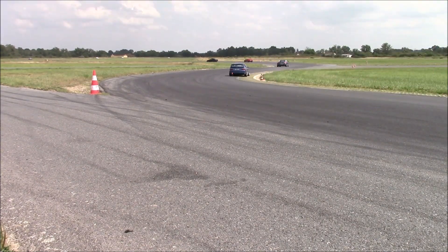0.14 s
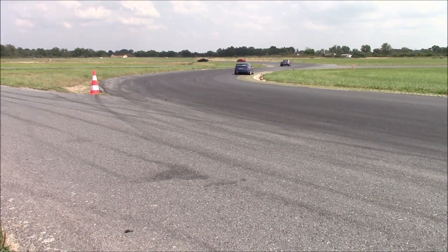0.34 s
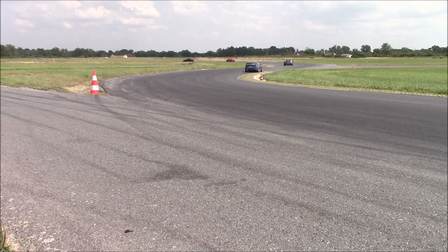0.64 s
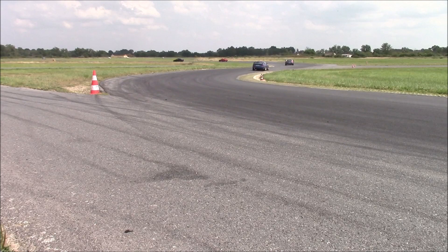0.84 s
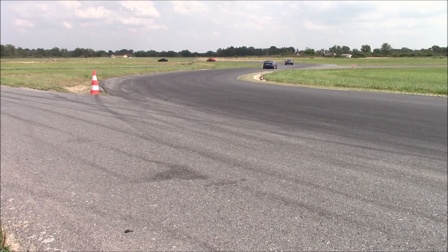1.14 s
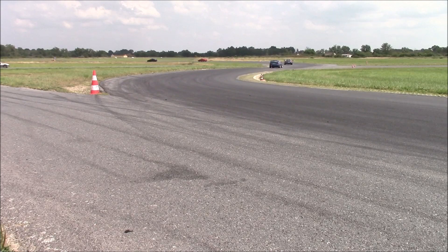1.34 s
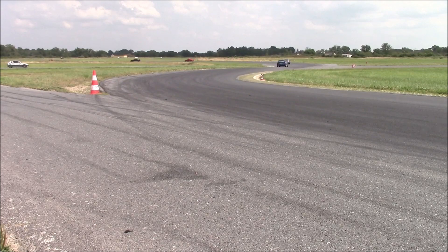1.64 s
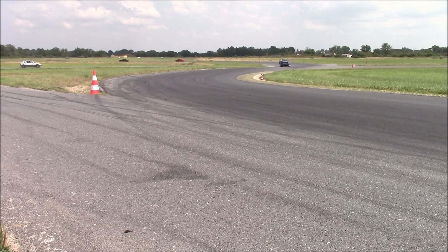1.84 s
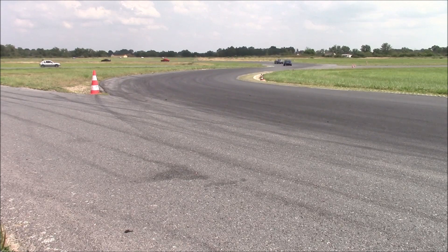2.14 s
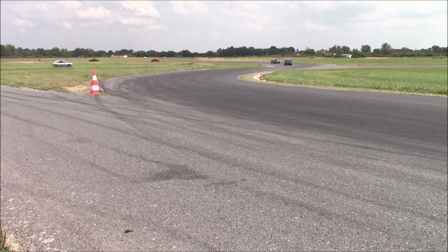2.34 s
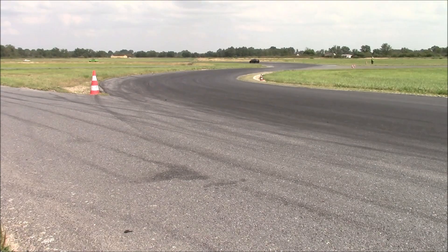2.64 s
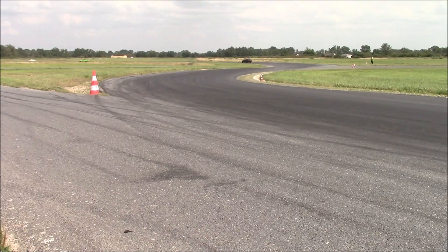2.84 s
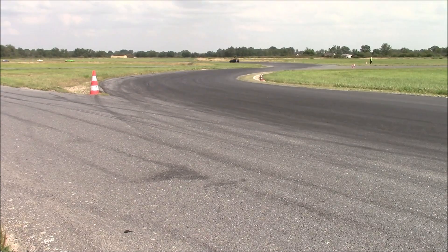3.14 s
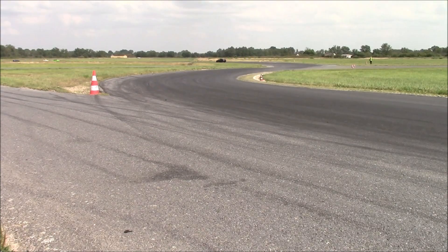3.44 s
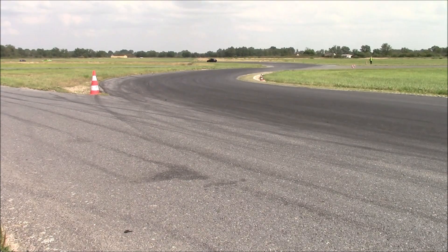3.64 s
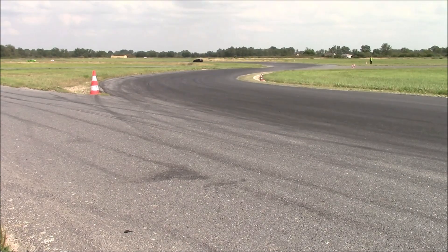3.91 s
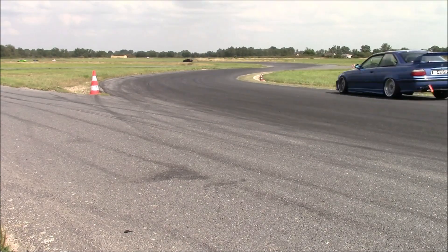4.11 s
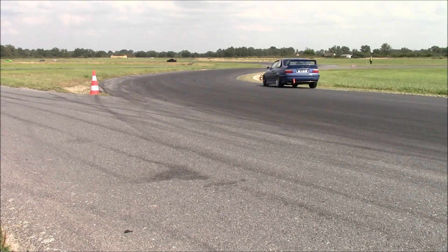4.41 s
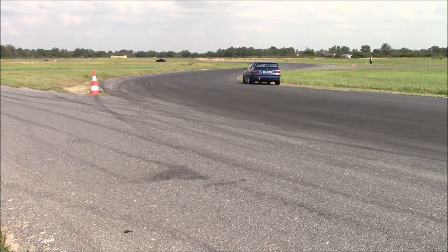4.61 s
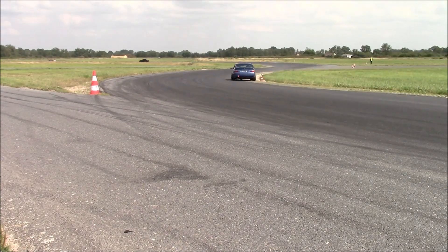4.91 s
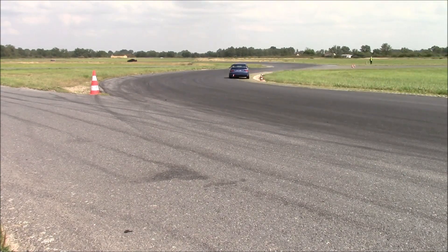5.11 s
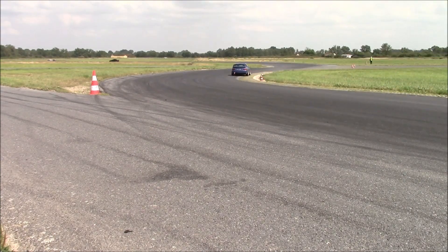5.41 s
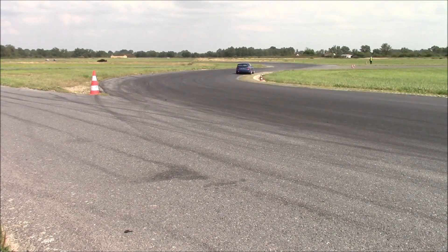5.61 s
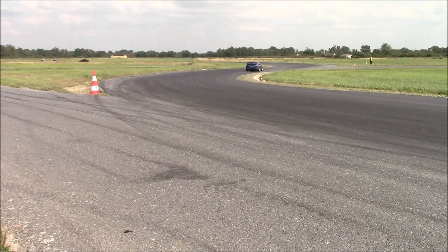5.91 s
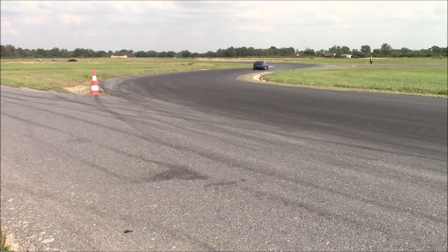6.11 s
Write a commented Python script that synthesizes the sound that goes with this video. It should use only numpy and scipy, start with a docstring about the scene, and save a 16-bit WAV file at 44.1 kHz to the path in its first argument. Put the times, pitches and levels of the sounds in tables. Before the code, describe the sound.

On an open race circuit, a raspy six-cylinder car pulls away at high revs, its tyres squealing briefly. A distant engine drones as it fades, lifts for a gear change and pops softly. After an abrupt cut, another pass swells up wide in stereo, rushes by with tyre hiss, dips, then drives off with higher, thinner squeals. Low rumble comes and goes at the fixed trackside microphone.

```python
"""A straight-six car drives away with a squeal of tyres while a low rumble comes and goes in stretches; a far
engine drones, the car lifts for a gear change and its exhaust pops. After a jump in time a second pass opens
wide in stereo, slides past, pulls away and squeals again. The exhaust is a sum of harmonics of two branches
firing in turn, with a click at each firing; roar, rasp, tyre scrub, hiss and rumble are filtered noise; squeals
and the far engine are frequency-modulated tones; the pops are pulses that ring a resonant pipe."""
import sys
import numpy as np
from scipy import signal
from scipy.fft import rfft, irfft, next_fast_len
from scipy.io import wavfile
from scipy.ndimage import uniform_filter1d

SR = 44100
rng = np.random.default_rng(int(sys.argv[2]) if len(sys.argv) > 2 else 0)


def gain_from_db(level_db):
    """Convert decibel levels to linear amplitude factors (20 dB per decade)."""
    decades = np.asarray(level_db, float) / 20
    return 10 ** decades


def transcribe(signal):
    """Save signal, clipped to [-1, 1], as a 16-bit WAV file at the path in sys.argv[1]."""
    frames = np.atleast_2d(signal).T
    limited = np.clip(frames, -1, 1)
    pcm = np.round(limited * 32767).astype(np.int16)
    wavfile.write(sys.argv[1], SR, pcm)


N = 276066
STEP = 40   # samples between the values of slow controls


def rms_one(x):
    """Normalization by the root mean square: the result has rms 1."""
    return x / np.sqrt(np.mean(x ** 2) + 1e-20)


def in_time(rows):
    """Linear interpolation of a table's columns over its times, one value a sample."""
    s, *columns = np.transpose(rows)
    return [np.interp(np.arange(N) / SR, s, column) for column in columns]


def sounding(rows, fade=.07):
    """Linear envelope: 1 inside a table's time span, with fades [s] at both ends."""
    t = np.arange(N) / SR
    fade_in = np.clip((t - rows[0][0]) / fade, 0, 1)
    fade_out = np.clip((rows[-1][0] - t) / fade, 0, 1)
    return fade_in * fade_out


def slow(rate):
    """Random fluctuation of rms 1: white noise through a double pole at rate [Hz], one value a step."""
    r = np.exp(-2 * np.pi * STEP * rate / SR)
    white = rng.standard_normal(N // STEP + 2002)
    run = signal.lfilter([1], [1, -2 * r, r * r], white)[2000:]   # the filter has settled by then
    return rms_one(run - run.mean())[:len(range(0, N, STEP))]


def spread(steps):
    """Linear interpolation from one value a step to one a sample."""
    return np.interp(np.arange(N) / STEP, np.arange(len(steps)), steps)


def drift(rate):
    """Random fluctuation as in slow(), one value a sample."""
    return spread(slow(rate))


def noise(spectrum, patchy_db, count=3):
    """Spectral shaping of white noise in overlapping bands, each flickering by itself; rms 1."""
    size = next_fast_len(N)
    log_hz = np.log(np.fft.rfftfreq(size, 1 / SR) + 1)
    hz, db = np.transpose(spectrum)
    gain = gain_from_db(np.interp(log_hz, np.log(hz), db, left=-90, right=-90))
    shaped = rfft(rng.standard_normal(size)) * gain
    centres = np.linspace(np.log(hz[0]), np.log(hz[-1]), count)
    total = 0
    for row in np.eye(count):
        share = np.interp(log_hz, centres, row)
        flicker = spread(gain_from_db(patchy_db * slow(19.0)))
        total = total + flicker * irfft(shaped * share, size)[:N]
    return rms_one(total)


def rumble(patchy_db):
    """Gated low-frequency noise: a faint floor, and stretches in which the rumble opens, holds and shuts."""
    # rumble spectrum: (frequency [Hz], density [dB per Hz])
    rumble_spectrum = [(12, -27), (20, 13), (38, 10.5), (70, 6), (102, 0.5), (130, -4.5), (170, -16),
                       (290, -120)]
    # stretches: (start of the hold [s], length of the hold [s], level [dB], extra level of the deepest part [dB])
    rumble_rows = [(0, 0.93, -38, 3), (.95, 0.48, -50, 3), (2.27, .05, -61, -8), (3.23, 0.94, -37, -0.5),
                   (4.198, .15, -49, 0.5), (4.628, 0.752, -39, -4.0), (5.8, .2, -50, 7),
                   (5.958, .35, -39, 8.5)]
    floor_db, deep_hz = -74, 45
    rise_s, fall_s = .03, 0.045
    t = np.arange(N) / SR
    bass = noise(rumble_spectrum, patchy_db, count=2)
    deep = signal.sosfilt(signal.butter(1, deep_hz, fs=SR, output="sos"), bass)
    out = gain_from_db(floor_db) * bass
    for s, length, db, deep_db in rumble_rows:
        shape = np.interp(t, [s - rise_s, s, s + length, s + length + fall_s], [0, 1, 1, 0]) ** 2
        out = out + gain_from_db(db) * shape * (bass + (gain_from_db(deep_db) - 1) * deep)
    return out


def far_engine():
    """Harmonic tone with frequency drift: a firing tone, its octave and a weak lope by amplitude modulation."""
    # far engine: (time [s], firing rate [Hz], level [dB])
    far_rows = [(1.2, 171, -35), (1.45, 168, -40), (1.57, 170.7, -33), (2.26, 169.9, -33),
                (2.645, 172.3, -31.5)]
    hz, db = in_time(far_rows)
    turn = 2 * np.pi * np.cumsum(hz + 1.5 * drift(13.9)) / SR
    firing = np.sin(turn) * (1 + 0.34 * np.sin(turn / 6))
    octave = gain_from_db(-5.0 + 3.5 * drift(2.6)) * np.sin(2 * turn)
    level = sounding(far_rows, fade=0.0058) * gain_from_db(db + 2.5 * drift(32.8))
    return level * np.sqrt(2) * (firing + octave)


def squeals():
    """Stick-slip oscillation: rubber slips and grips, so pitch and strength of each tone shake at random."""
    # one track a squeal: (time [s], centre frequency [Hz], level [dB])
    squeal_tracks = [
        [(0.6, 819, -29), (1.056, 782, -24), (1.5, 798, -31)],
        [(5.4, 1606, -53), (5.61, 1708, -33), (5.9, 1681, -39.5), (6.26, 1612, -44)],
        [(5.3, 2420, -49), (5.83, 2347, -44), (5.928, 2465, -47), (6.2, 2389, -44)],
        [(1.65, 1550, -46), (1.962, 1484, -44), (2.05, 1483, -51)],
    ]
    # rms shake of the frequency of each squeal: [Hz]
    squeal_shakes = [29.35, 87.6, 110, 93]
    out = 0
    for rows, shake_hz in zip(squeal_tracks, squeal_shakes):
        hz, db = in_time(rows)
        turn = 2 * np.pi * np.cumsum(hz + shake_hz * drift(63.4)) / SR
        out = out + sounding(rows) * gain_from_db(db + 1.1 * drift(25)) * np.sqrt(2) * np.sin(turn)
    return out


def firing_puffs(turn):
    """Periodic modulation: each firing lets out a puff; one branch is stronger, one cylinder leads the cycle."""
    return np.exp(0.45 * np.cos(2 * turn - .5) + 0.061 * np.cos(turn) + 0.23 * np.cos(turn / 3))


def treble(rasp_db, scrub_db, hiss_db, width, puffs):
    """Amplitude-modulated noise: rasp and tyre scrub pulse with the firings, hiss and air less so."""
    # spectra of the four noises: (frequency [Hz], density [dB per Hz])
    rasp_spectrum = [(530, -9), (900, 3), (1090, -2), (1370, -3.5), (2000, -12), (2600, -55), (4400, -120)]
    scrub_spectrum = [(1180, -30), (2000, -3.5), (2820, -2), (4500, -18), (5850, -52), (9900, -120)]
    hiss_spectrum = [(2650, -2), (4500, -1.5), (6630, 0), (8000, -8.5), (10400, -34), (17600, -120)]
    air_spectrum = [(4710, -7), (8000, -2.5), (10700, 0), (13700, -11), (14500, -19)]
    air_db = hiss_db + 2.5 - 14.5 * width   # the top is duller while the stereo image is wide
    rough = gain_from_db(rasp_db) * noise(rasp_spectrum, 0.21) + gain_from_db(scrub_db) * noise(scrub_spectrum, 0.86)
    smooth = gain_from_db(hiss_db) * noise(hiss_spectrum, 1.0) + gain_from_db(air_db) * noise(air_spectrum, 1.0)
    pulsed = rough * rms_one(puffs ** 0.47) + smooth * rms_one(puffs ** 0.25)
    return gain_from_db(1.06 * drift(6.2)) * pulsed


def pops(pipe=((330, .05), (430, .04))):
    """Resonance: with the throttle shut, each pop is a soft push that rings the pipe (frequency [Hz], t60 [s])."""
    # exhaust pops: (time [s], relative strength [dB])
    pop_rows = [(2.276, -6.5), (2.304, -11), (2.34, -17), (2.445, -15), (2.502, -16), (2.539, -18)]
    clicks, out = np.full(N, 1e-18), 0
    clicks[[round(s * SR) for s, db in pop_rows]] = gain_from_db(np.array(pop_rows)[:, 1] - 9.5)
    push = signal.sosfilt(signal.butter(4, [220, 700], "band", fs=SR, output="sos"), clicks)
    for hz, t60 in pipe:
        r, w = gain_from_db(-60 / (t60 * SR)), 2 * np.pi * hz / SR
        out = out + signal.lfilter([0, np.sin(w)], [1, -2 * r * np.cos(w), r * r], push)
    return out


def roar(lope_db):
    """Broadband noise of the tyres, shaped in spectrum, at the level of the exhaust's lope."""
    # roar spectrum: (frequency [Hz], density [dB per Hz])
    roar_spectrum = [(120, -37), (180, -15), (230, -10), (330, -5), (550, 4), (800, -1.5), (1000, -33),
                     (1200, -40)]
    return gain_from_db(lope_db) * noise(roar_spectrum, 1.0)


def cracks(turn, upper_db, uneven=.3, early=.75, jitter=.03, scatter_db=2.5):
    """Pulse train: a sharp click leads every firing; the two branches are unevenly spaced (phases in radians)."""
    # relative strength of the six clicks of a cycle: [dB]
    cylinder_strengths = [9, 14, -8.5, 4.5, 3, 10.5]
    firing = np.arange(1, int(turn[-1] / np.pi))
    late, strength = rng.standard_normal((len(firing), 2)).T
    at = np.searchsorted(turn, np.pi * firing + uneven * (firing % 2) - early + jitter * late)
    clicks = np.full(N, 1e-18)
    clicks[at] = gain_from_db(np.array(cylinder_strengths)[firing % 6] + scatter_db * strength)
    rise = signal.butter(2, 1300, "high", fs=SR, output="sos")
    fall = signal.butter(4, 2100, fs=SR, output="sos")
    train = rms_one(signal.sosfilt(np.vstack([rise, fall]), clicks))
    # -33 dB where the upper tones stand at -35 dB; the clicks swing 1.24 times as far
    return gain_from_db(-33 + 1.24 * (upper_db + 35)) * train


def swell(multiple):
    """Gaussian envelopes in dB by which one exhaust tone swells or fades, one value a step."""
    # swells: (centre [s], width between 1/e points [s], multiple of the branch rate, change [dB])
    swell_rows = [(.08, 0.71, 5, -4), (.12, 0.65, 6, -11), (0.206, 0.62, 4.67, 15),
                  (0.278, 0.47, 6.33, -10.5), (0.372, 0.52, 14, 7.5), (0.327, 0.59, 16, 6),
                  (.4, 0.68, 3.33, -10), (0.673, 0.27, 7, -6), (0.71, 0.35, 9, 8.5), (0.762, 0.42, 4, 3.5),
                  (0.877, 0.16, 6, -16), (0.942, 0.36, 5, -8.5), (1.0, 0.13, 9, -16), (1.05, 0.38, 6, 7),
                  (1.051, .2, 6.33, 7), (1.12, 1.0, 11, 14.5), (1.12, 0.94, 4.33, -14.5), (1.21, .2, 9, 14),
                  (1.3, 0.2, 13, 17.5), (1.298, 1, 1, -11), (1.117, 0.23, 4, -4.5), (1.15, 0.18, 5, 2),
                  (1.37, 0.82, 3, -7), (1.52, 0.28, 5, -7.5), (1.593, 0.17, 7, 3.5), (1.62, 0.25, 6.33, 7),
                  (1.802, 1, 4, 4.5), (2.045, 0.72, 3.67, 11), (2.0, 0.91, 11, 9), (2.2, 0.88, 7, -14),
                  (2.36, 0.92, 6.33, -18), (2.403, 0.29, 3, 9.5), (2.48, 0.089, 3, 3), (2.55, 0.12, 4, 9),
                  (2.578, 0.38, 3.67, 19), (2.715, 0.13, 3, -6), (2.812, 0.089, 5, 12),
                  (2.95, 0.69, 1, -16), (3.0, 0.69, 5, -8.5), (3.069, 0.37, 6, -36),
                  (3.16, 0.74, 4.33, -18), (3.303, 0.15, 7, 2.5), (3.406, 0.11, 5, -4), (3.4, .5, 14, 5),
                  (3.419, 0.14, 4, 4), (3.5, 0.41, 13, 11), (3.614, .15, 6, 0), (3.85, .7, 11, 4.5),
                  (3.848, 0.22, 7, -4), (3.917, .35, 4.33, 4.5), (3.926, 0.23, 6, -9),
                  (3.92, 0.27, 6.33, -10), (3.996, 0.093, 5, 7), (4.025, 0.16, 7, 5),
                  (4.101, 0.14, 3.67, 13), (4.1, .12, 4.33, 9.5), (4.047, 0.27, 4, -4),
                  (4.12, 0.11, 3, 2.5), (4.2, 0.13, 6, -10), (4.201, .15, 5.33, 12), (4.2, 0.59, 6.33, 6.5),
                  (4.3, .3, 7, 3), (4.33, 0.063, 5, 2), (4.44, 0.19, 5, -7), (4.36, 0.697, 3.33, -9),
                  (4.363, 1, 3, 3.5), (4.5, 0.47, 4.67, 9), (4.598, 0.13, 4, -8), (4.7, .12, 6.33, 4.5),
                  (4.72, 0.098, 9, 5), (4.799, 0.96, 6.67, 24.5), (4.829, 0.13, 9, -22), (4.85, 0.54, 1, 7),
                  (5.202, 0.38, 6.33, 9.5), (5.098, 0.35, 2, -2), (5.2, 0.46, 3, -5.5),
                  (5.392, 0.22, 4, -6.5), (5.42, 0.24, 6, 5.5), (5.53, 0.11, 6, -15), (5.647, 0.12, 9, -12),
                  (5.67, 0.24, 7, -15), (5.847, 0.54, 4.33, 7.5), (5.9, 0.89, 1, -7), (6.0, .6, 12, -8),
                  (6.08, 0.33, 3.33, -4), (6.245, 0.071, 6, 5.5)]
    t = np.arange(0, N, STEP) / SR
    return sum(db * np.exp(-(2 * (t - s) / length) ** 2)
               for s, length, k, db in swell_rows if round(3 * k) == round(3 * multiple))


def exhaust(turn, level_db, tilt, upper_db, lope_db):
    """Fourier synthesis: whole multiples of the branch rate are clean tones, unequal cylinders add thirds."""
    # tones in rising thirds: (rounded multiple of the branch rate, relative level [dB])
    order_levels = [(0.333, -47), (0.667, -54), (1.0, -24), (1.33, -28), (1.67, -38.5), (2.0, -6.5),
                    (2.33, -17.5), (2.67, -26.5), (3.0, -3.5), (3.33, -16), (3.67, -19), (4.0, -3),
                    (4.33, -11.5), (4.67, -20), (5.0, 1), (5.33, -20), (5.67, -16), (6.0, -5), (6.33, -12),
                    (6.67, -35), (7.0, -2.5), (7.33, -29), (7.67, -20.5), (8.0, -41), (8.33, -28.5),
                    (8.67, -32), (9.0, -18.5), (9.33, -25), (9.67, -32.5), (10.0, -27.5), (10.3, -34),
                    (10.7, -36), (11.0, -25), (11.3, -33), (11.7, -50), (12.0, -39.5), (12.3, -25),
                    (12.7, -68), (13.0, -29), (13.3, -31.5), (13.7, -48), (14.0, -28.5), (14.3, -48),
                    (14.7, -47), (15.0, -37.5), (15.3, -29), (15.7, -64), (16.0, -30)]
    pass_s, pass_length_s, pass_slur = 4.15, .8, .3   # sliding past, the car churns the air: extra slur [rad]
    level_db, tilt, upper_db, lope_db = [c[::STEP] for c in (level_db, tilt, upper_db, lope_db)]
    bass_swing_db = level_db + 17
    t = np.arange(0, N, STEP) / SR
    slur = .07 + pass_slur * np.exp(-(2 * (t - pass_s) / pass_length_s) ** 2)
    lead, out = 1.85 + 0.43 * slow(0.47), 0
    for thirds, (_, db) in enumerate(order_levels, start=1):
        k = thirds / 3
        phase = slur * np.sqrt(k) * slow(6)   # moving air slurs the tones
        if thirds % 3:
            db = db + lope_db + 6.5 + 4.0 * slow(1.46)
            phase = phase + 2 * np.pi * rng.random()
        else:
            if k <= 7:
                octaves = np.log2(max(k, 2) / 4)
                db = db + level_db + tilt * octaves + 0.66 * slow(56.0)
            else:
                phase = phase + .35 * slow(12)   # the upper multiples are slurred more
                db = db + upper_db + 26.0 + 1.5 * slow(4.2)
            # two even pulses a turn: the odd multiples run a quarter cycle behind,
            # so the branches differ in shape only
            phase = phase + lead - np.pi / 2 * (k % 2) + 0.026 * k ** 2
        if k < 1.5:   # tones well below the firing tone (k = 2) rise and fall further with the level
            db = db + bass_swing_db
        tone = np.cos(k * turn + spread(phase))
        out = out + spread(np.sqrt(2) * gain_from_db(db + swell(k))) * tone
    return out


def port_difference(same, unrelated):
    """Stereo decorrelation: half of left minus right, by level, phase and coherence across frequency."""
    # ports: (frequency [Hz], level against the middle [dB], phase ahead [rad], share of unrelated noise [0-1])
    port_rows = [(500.3, -70, 0, 0.75), (865, -24.5, -0.17, 0.5), (1700, -13.5, 0.87, .15),
                 (3380, -12.5, -0.86, 0.6), (5500, -4, -2, .35), (10100, -2, -2, 0.8), (14000, 2, -1, .7)]
    size = next_fast_len(N)
    hz, *columns = np.transpose(port_rows)
    log_hz = np.log(np.fft.rfftfreq(size, 1 / SR) + 1)
    db, ahead, share = [np.interp(log_hz, np.log(hz), c) for c in columns]
    share = np.clip(share, 0, 1)
    coherent = np.sqrt(1 - share) * np.exp(1j * ahead) * rfft(same, size)
    incoherent = np.sqrt(share) * rfft(unrelated, size)
    return irfft(gain_from_db(db) * (coherent + incoherent), size)[:N]


def scene():
    """Superposition of all sources as a middle and a side signal, summed for the two microphone ports."""
    # exhaust, relative levels: (time [s], branch firing rate [Hz], level [dB],
    # tilt of multiples 1-7 [dB per octave], level of the multiples above 7 [dB], level of the lope [dB])
    exhaust_rows = [(0.0, 100.9, -14.5, 1.5, -41, -28), (0.2, 101.5, -16, 3, -33, -27.5),
                    (0.4, 102.1, -16.2, 2.5, -33.5, -27.0), (0.6, 102.6, -16, 2, -38, -29),
                    (0.8, 103.2, -14, 1, -40.4, -26.5), (1.1, 104.4, -14, 0, -46, -27.5),
                    (1.3, 105.7, -14.5, -2.4, -51.5, -29.5), (1.5, 106.1, -16.7, -2.0, -54.5, -29.5),
                    (1.75, 107.7, -21.1, -6, -59, -29.5), (2.0, 108.2, -21, -5, -54, -32),
                    (2.22, 109.3, -24, -5, -60, -39), (2.28, 106.4, -45, -11, -68.4, -43),
                    (2.4, 106.5, -52, -8.8, -72, -46.5), (2.5, 106.4, -40.5, -9.8, -68, -42),
                    (2.645, 106.1, -38, -12.5, -68, -40), (2.646, 118.8, -52, -11, -56, -51),
                    (2.82, 119.6, -39, -5.5, -50, -41), (3.05, 121.9, -26, -1.5, -47.5, -36),
                    (3.22, 121.9, -20, 1, -35, -31.5), (3.4, 122.9, -16, -1, -38, -31.0),
                    (3.62, 122.1, -19.5, -3, -34.5, -29), (3.82, 119.4, -19, 0.5, -35.5, -26),
                    (3.98, 114.2, -21.5, -4, -35, -24.5), (4.12, 110.0, -22, -6, -39.5, -23.5),
                    (4.3, 107.8, -26.5, 1.5, -39.4, -25), (4.5, 106, -33, 6, -54.5, -28),
                    (4.62, 106.2, -19.5, 0.3, -43.4, -27.5), (4.72, 110.1, -17, 2, -36, -21.5),
                    (4.9, 107.2, -16.5, 2, -52, -29), (5.12, 108.9, -16.5, 1.5, -40, -25.5),
                    (5.35, 109.2, -15.5, 0, -43.3, -28.5), (5.47, 110.7, -19, -3.7, -43.5, -26),
                    (5.6, 110.1, -20.5, -3.5, -40.5, -28), (5.74, 111.1, -18.5, -3.5, -54, -23),
                    (5.9, 110.8, -16.5, -2, -55, -22), (6.08, 111.8, -16, 2.3, -54.5, -23.5),
                    (6.26, 112.7, -17.7, 1.7, -48, -20.5)]
    # noises of the car: (time [s], rasp level [dB], tyre scrub level [dB], hiss level [dB])
    noise_rows = [(0, -22.5, -37.5, -45), (.18, -23.5, -40.5, -49), (.35, -24.5, -34, -48.5),
                  (.6, -27.5, -42.5, -51.5), (.85, -32.5, -41, -52.5), (1.2, -35, -43, -54.5),
                  (1.5, -38.5, -46, -59), (1.85, -44, -49, -63), (2.2, -48.5, -53.5, -66),
                  (2.645, -49, -59.5, -66.5), (2.646, -38, -46.5, -58.5), (2.85, -32, -38.5, -51.5),
                  (3.15, -26, -33, -42.5), (3.3, -20.5, -30, -38.5), (3.5, -21, -29, -37),
                  (3.73, -20, -29.5, -40.5), (3.94, -18, -31, -34), (4.12, -18.5, -24.5, -32),
                  (4.24, -17, -27, -37.5), (4.35, -21, -32, -44), (4.46, -23, -38.5, -49),
                  (4.56, -27, -45.5, -56), (4.74, -25, -40.5, -50.5), (4.88, -30, -45.5, -51.5),
                  (5.0, -28, -41.5, -53), (5.32, -33, -44.5, -47.5), (5.4, -30.5, -47, -45.5),
                  (5.61, -37, -41.5, -46), (5.82, -39, -43.5, -44.5), (6.1, -32, -42.5, -51),
                  (6.26, -33, -48, -51.5)]
    # stereo width: (time [s], strength of the treble's side signal [0-1], small lead of the left port [samples])
    width_rows = [(0, 0, 0.0022), (2.645, 0.12, 0), (2.646, 0.84, 0.0036), (3.2, 0.91, 0),
                  (3.7, 0.8, 0.00023), (4.0, 0.45, 0.039), (4.25, 0.1, 0.032), (4.33, 0.08, 0.13),
                  (4.5, 0.1, 0.093), (4.7, 0.02, 0.34), (5.4, 0, 0.2), (5.9, 0, 0.026), (6.26, 0.01, 0.075)]
    branch_hz, level_db, tilt, upper_db, lope_db = in_time(exhaust_rows)
    noises_db = in_time(noise_rows)
    width, lead = in_time(width_rows)
    width = np.clip(width, 0, 1)
    turn = 2 * np.pi * np.cumsum(branch_hz) / SR   # phase of the branch firings
    puffs = firing_puffs(turn)
    low = exhaust(turn, level_db, tilt, upper_db, lope_db) + roar(lope_db) + far_engine() + pops()
    low += cracks(turn, upper_db) + squeals()
    mid = low + treble(*noises_db, width, puffs) + rumble(2.8)
    side = width * port_difference(mid, treble(*noises_db, width, puffs))
    side += lead * np.gradient(uniform_filter1d(low, size=30))   # a slope times a lead is a small time shift
    side += gain_from_db(-27.0) * rumble(3.0)
    return np.array([mid + side, mid - side])


def band_limit(x):
    """A steep low-pass at the top of the band."""
    return signal.sosfilt(signal.butter(12, 14880, fs=SR, output="sos"), x)


def record(dry):
    """Soft saturation rounds the peaks a little, then a first-order high-pass cuts the lowest bass."""
    rounded = 1.114 * np.tanh(dry / 1.3)
    bass_cut = signal.butter(1, 12, "high", fs=SR, output="sos")
    mix = signal.sosfilt(bass_cut, rounded)
    return band_limit(mix)


dry = scene()
out = record(dry)
transcribe(out)
```